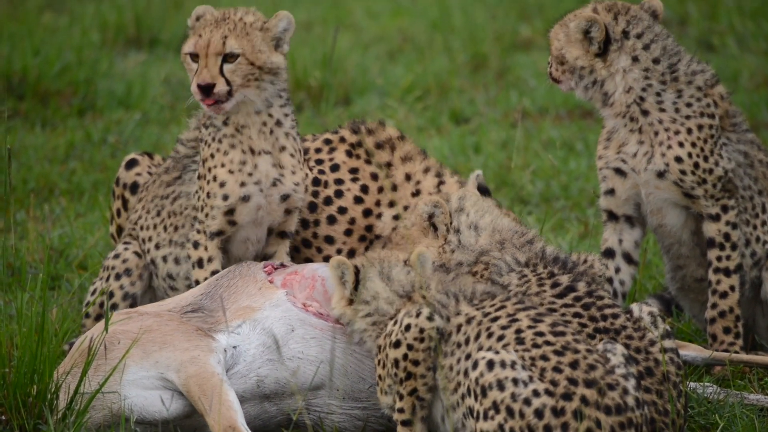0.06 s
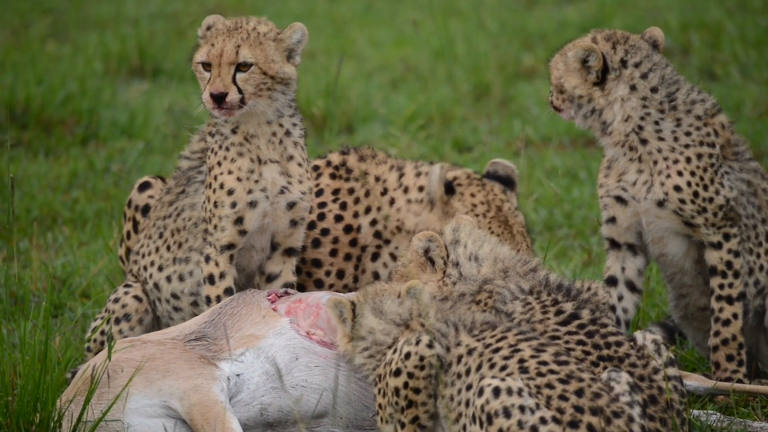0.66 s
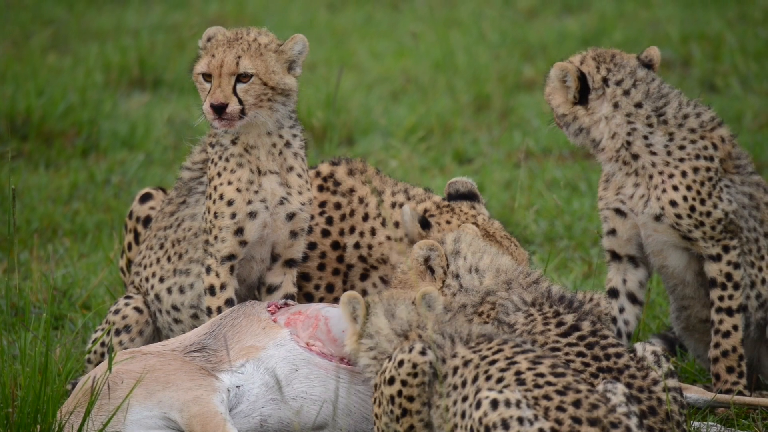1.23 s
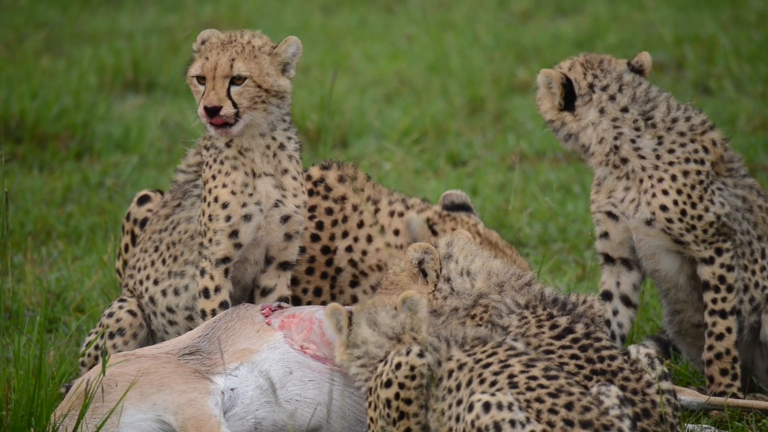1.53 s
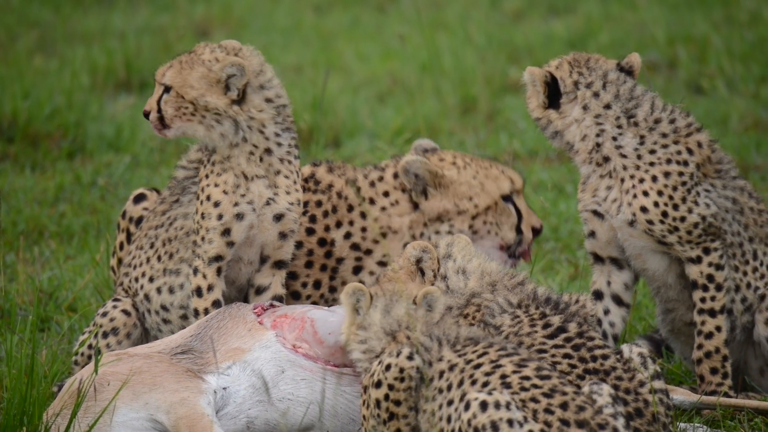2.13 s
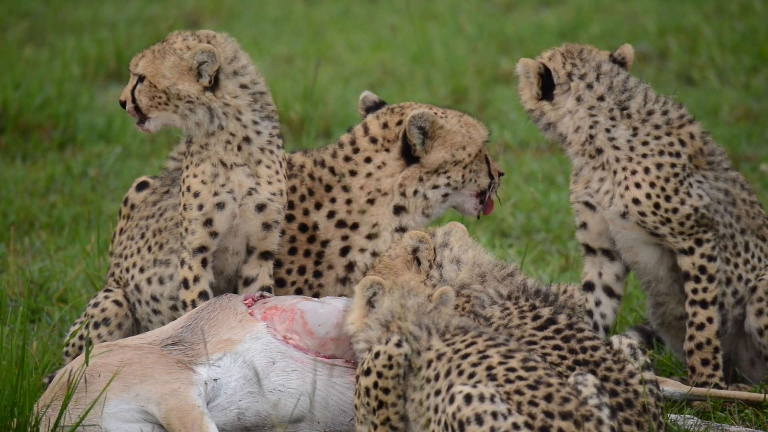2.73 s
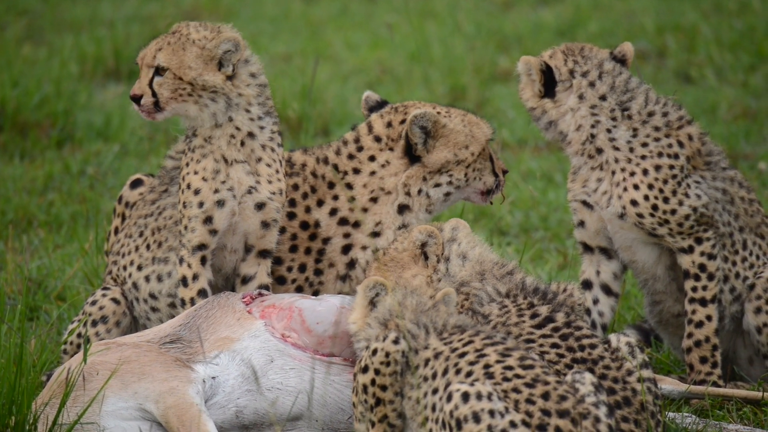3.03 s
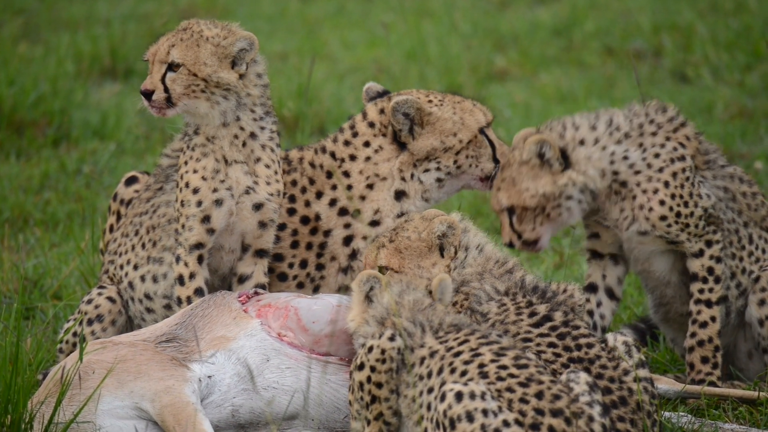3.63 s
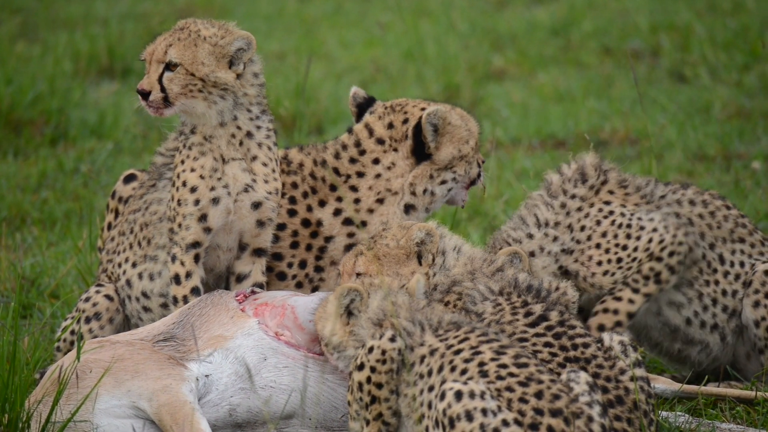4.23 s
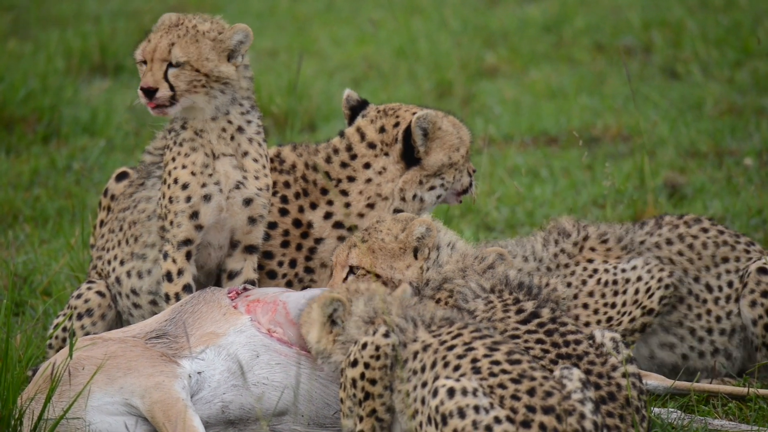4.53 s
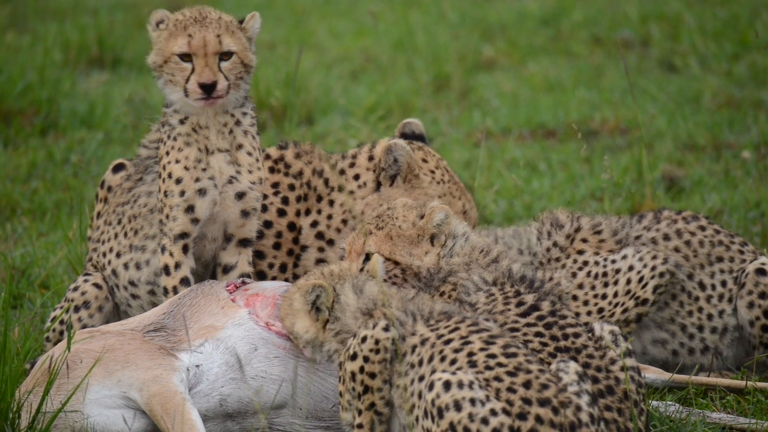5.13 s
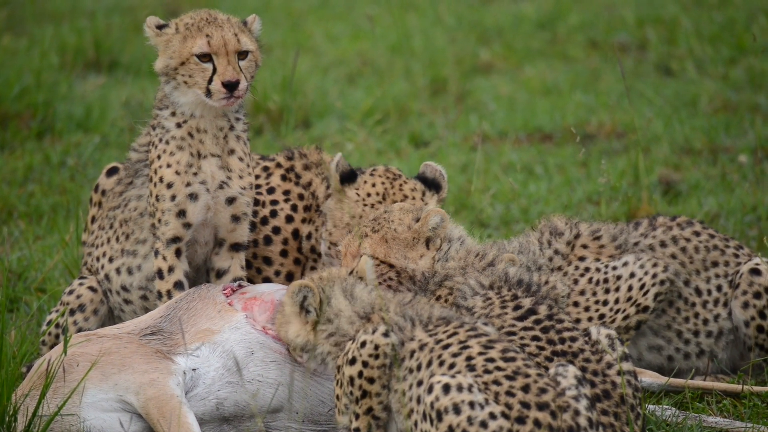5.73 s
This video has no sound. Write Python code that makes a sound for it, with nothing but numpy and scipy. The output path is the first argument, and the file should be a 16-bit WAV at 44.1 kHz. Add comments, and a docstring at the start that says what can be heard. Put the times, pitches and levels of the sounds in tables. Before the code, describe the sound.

Quick, birdlike falling chirps come at a steady pace outdoors, with a dove's rolling song and faraway birds behind them.

```python
"""Far birds chatter in downward slurs over microphone hiss, a faint hum and a murmur of distant doves.
A dove repeats a three-part song with a rolling middle; a faint low tone swells once. Loudest is a small
near bird: about every 0.8 s it whistles a chirp of falling swoops, in one of four shapes, shaped by its
throat resonance. Short rasps and hoarse scratches come between. The grass and bushes of the open
grassland scatter thin tails."""
import sys
import numpy as np
from scipy import signal
from scipy.fft import rfft, irfft, next_fast_len
from scipy.io import wavfile
from scipy.ndimage import uniform_filter1d

SR = 44100
rng = np.random.default_rng(int(sys.argv[2]) if len(sys.argv) > 2 else 0)


def wrap_up_sound(samples):
    """Save the sound to the file named by the first command line argument, as 16-bit audio."""
    columns = np.atleast_2d(samples).T
    # keep every value between -1 and 1, then stretch to whole-number steps
    tamed = np.clip(columns, -1, 1)
    steps = np.round(tamed * 32767).astype(np.int16)
    wavfile.write(sys.argv[1], SR, steps)


N = 254456

# Background spectra. Each row: frequency in Hz, relative density in dB.
AIR_SPECTRUM = [(20, -8), (60, -3), (100, 1), (150, -11), (220, -33), (330, -9), (1100, -5.5), (4500, -12),
                (6000, -24), (8000, -27.5), (11000, -24), (15500, -19)]
CHORUS_SPECTRUM = [(1100, -11.5), (1500, -4), (2200, 2), (2800, -0.5), (3400, 1.5), (4000, -21),
                   (5000, -79), (7000, -63)]
FAR_DOVE_SPECTRUM = [(300, -49), (380, -7.5), (430, 3), (500, -18.5), (570, -3), (680, -5.5), (850, 2.5),
                     (1000, -6.5), (1200, -32.5)]

# Far downward slurs. Each row: start in seconds, top pitch in Hz, level in dB, left minus right in dB.
SLURS = [(0, 2960, -53.5, 7), (.222, 3110, -53.5, 11), (0.478, 3180, -51, 3), (.744, 3330, -49, 12.5),
         (.846, 2640, -52, 17), (1.089, 3280, -51, 4), (2.272, 2700, -55.5, 13), (2.394, 3160, -59.5, 20),
         (2.456, 2950, -57.5, -23), (2.805, 3220, -48.5, 1), (3.189, 3330, -47.5, 9),
         (3.496, 3445, -46, -2), (3.948, 2900, -50, 20), (3.986, 2600, -54.5, 19), (4.195, 2490, -46.5, 5),
         (4.221, 3170, -54, 21), (4.405, 3490, -52, 19), (4.683, 3076, -58, -2), (4.839, 3320, -48, 2),
         (4.932, 3090, -54.5, 18), (5.122, 3550, -56, -26), (5.389, 3426, -41, 8.5),
         (5.638, 3040, -60.5, 24)]
# Far upward flicks. Each row: start in seconds, first pitch in Hz, level in dB.
TWITTERS = [(0.037, 1600, -55), (.46, 3460, -62), (.52, 3700, -60.5), (.66, 1616, -49.5), (1.91, 3400, -62),
            (2.32, 3250, -61.5), (2.386, 3650, -58.5), (2.642, 3690, -61.5), (3.325, 1500, -60),
            (3.577, 1680, -59)]
# Whistled glides, and the sharp falling onset of the scratchy call at 4.19 s.
# Each row: start and length in seconds, first and last pitch in Hz, level in dB, left minus right in dB.
GLIDES = [(0.354, 0.11, 2060, 2270, -56, 0), (1.041, .012, 5030, 2150, -53, 0),
          (1.552, 0.053, 1338, 1296, -57, 16), (1.557, 0.18, 1900, 1526, -61, 23),
          (2.562, 0.09, 2176, 2320, -57, -7), (2.769, .14, 2280, 2384, -55, -4),
          (3.058, .09, 2250, 2430, -51, 1), (3.241, 0.052, 2293, 2040, -55, 12),
          (3.626, 0.11, 4130, 3300, -53, -14.5), (3.767, 0.12, 1500, 1257, -60, 7),
          (4.032, 0.059, 1140, 1152, -58.5, 12), (4.189, 0.026, 3877, 3450, -40.5, 18.5),
          (5.27, 0.015, 3760, 3510, -50.5, 3)]

# The dove's three notes. Each row: time into the note in seconds, pitch in Hz, level in dB.
COO = [(0, 700, -58), (.007, 810, -46), (.02, 940, -47), (.035, 950, -46), (.06, 885, -45), (.09, 835, -44),
       (.108, 725, -47), (.12, 690, -60)]
ROLL = [(0, 700, -60), (.012, 790, -48), (.028, 905, -45), (.07, 865, -44), (.115, 800, -44),
        (.2, 790, -44.5), (.32, 780, -45), (.355, 770, -53), (.37, 760, -62)]
LAST_NOTE = [(0, 700, -58), (.016, 790, -43), (.03, 850, -43), (.047, 860, -46), (.066, 820, -42),
             (.078, 790, -57)]
# Dove songs. Each row: coo start, roll start, one roll beat and last note start in seconds, gain in dB.
DOVE_SONGS = [(.267, .544, .778, .926, -1), (1.398, 1.675, 1.897, 2.069, -1),
              (2.53, 2.814, 3.053, 3.204, -.3), (3.67, 3.947, 4.201, 4.336, .6),
              (4.801, 5.093, 5.319, 5.468, 0)]

# Chirp shapes, one swoop a row. Each row: top time in seconds, top pitch in Hz, bottom time in seconds,
# bottom pitch in Hz, bow exponent (under 1 plunges at once, over 1 holds and then drops).
SWING = [(.010, 3900, .019, 3230, 1.4), (.023, 3430, .040, 2830, .7), (.055, 3350, .063, 2700, 1.2),
         (.068, 3380, .106, 2760, .6)]
DIP = [(.008, 4050, .028, 2950, 1.1), (.032, 3200, .052, 2250, 1.15), (.062, 2930, .077, 2200, 2),
       (.102, 3450, .131, 2080, .5)]
STEP = [(.008, 3900, .052, 2300, .85), (.060, 3020, .077, 2280, 1), (.085, 3000, .109, 2570, .5)]
SLIDE = [(.008, 4300, .024, 3080, 1), (.028, 3650, .082, 2220, .75), (.092, 2780, .106, 2520, 2),
         (.112, 3560, .139, 2600, 2.2)]
# Near chirps. Each row: start in seconds, shape, length factor, pitch factor, gain in dB.
CHIRPS = [(.642, SWING, 1, 1, 0), (1.392, DIP, 1, 1, 0), (2.117, STEP, 1, 1, 0), (2.956, SLIDE, 1, 1, 0),
          (3.731, DIP, 1, 1, -.3), (4.499, STEP, 1.02, 1.005, -.5), (5.333, SWING, .98, .995, -.7)]
# The near bird's throat resonance. Each row: pitch in Hz, level in dB.
THROAT_RESONANCE = [(2150, -36.5), (2500, -32), (2750, -28.5), (3100, -25.5), (3450, -23), (3800, -26),
                    (4250, -30.5)]
# Chirp overtones. Each row: overtone frequency in Hz, level against the fundamental in dB.
CHIRP_OVERTONES = [(4400, -13), (5400, -34), (6500, -42), (7700, -62.5), (9000, -46), (10500, -42),
                   (12500, -40)]
# Chirp at the microphones. Each row: frequency in Hz, left minus right in dB.
CHIRP_BALANCE = [(2400, 5), (3000, 1), (3500, 2.5), (4000, 6), (6000, 0)]

# Rasping calls. Each row: start and length in seconds, top pitch in Hz, level in dB.
RASPS = [(0.892, 0.035, 421, -49), (0.943, 0.04, 470, -47.5), (1.004, 0.028, 496.6, -47),
         (1.067, .032, 500, -48.5)]
# Scratchy calls. Each row: start and length in seconds, level in dB.
SCRATCHES = [(3.48, 0.094, -57.5), (3.64, .36, -54), (4.194, 0.17, -45), (5.625, 0.11, -55.5)]


def amp(db):
    return 10 ** (np.asarray(db) / 20)


def unit_rms(x):
    return x / np.sqrt(np.mean(x ** 2) + 1e-20)


def lookup(points, hz):
    """Interpolates on a log-frequency axis."""
    point_hz, value = np.transpose(points)
    return np.interp(np.log(hz + 1), np.log(point_hz + 1), value)


def colour(x, gain):
    """Filters by gain(Hz)."""
    size = x.shape[-1]
    return irfft(rfft(x) * gain(np.fft.rfftfreq(size, 1 / SR)), size)


def drift(size, cutoff_hz):
    """Smooth random motion, rms about one."""
    noise = rng.standard_normal(next_fast_len(size + SR // 10))
    return unit_rms(colour(noise, lambda f: 1 / (1 + (f / cutoff_hz) ** 4)))[:size]


def pan(x, side_db):
    """Places a sound by its left minus right level."""
    return x * amp([[side_db / 2], [-side_db / 2]])


def add(mix, start_s, sound):
    part = mix[:, max(round(start_s * SR), 0):][:, :sound.shape[-1]]
    part += sound[..., :part.shape[1]]


def scatter(x, t60_s, wet_db):
    """Grass and bushes return a thin tail, different at each microphone."""
    t = np.arange(SR) / SR
    echoes = rng.standard_normal((2, SR)) * (rng.random((2, SR)) < .1)
    tail = echoes * amp(-60 * t / t60_s) * (1 - np.exp(-t / .006))
    tail /= np.linalg.norm(tail, axis=1, keepdims=True)
    return amp(wet_db) * signal.fftconvolve(x, tail, axes=1)[:, :N]


def wash(spectrum, level_db, patch_db, swell_db, coherence, patch_frames, patch_bins):
    """Noise, patchy in time and frequency under a slow swell, partly alike in both channels."""
    frames, hz = N // 256 + 5, np.fft.rfftfreq(1024, 1 / SR)
    left_re, left_im, own_re, own_im, patches = rng.standard_normal((5, frames, 513))
    patches = uniform_filter1d(patches, patch_frames, axis=0)
    patches = unit_rms(uniform_filter1d(patches, patch_bins, axis=1))
    swell = unit_rms(uniform_filter1d(rng.standard_normal(frames), size=40))[:, None]
    left = left_re + 1j * left_im
    right = coherence * left + np.sqrt(1 - coherence ** 2) * (own_re + 1j * own_im)
    spectra = np.array([left, right]) * amp(lookup(spectrum, hz) + patch_db * patches + swell_db * swell)
    _, noise = signal.istft(spectra.swapaxes(1, 2), nperseg=1024, noverlap=768)
    return amp(level_db) * unit_rms(noise[:, :N])


def background(hum_hz=99, hum_db=-80):
    """Still air and microphone hiss, a blur of far birds and doves, and a low wavering hum."""
    air = wash(AIR_SPECTRUM, level_db=-62.5, patch_db=1, swell_db=.2,
               coherence=.43, patch_frames=10, patch_bins=10)
    chorus = wash(CHORUS_SPECTRUM, level_db=-56, patch_db=5.5, swell_db=1,
                  coherence=.46, patch_frames=7, patch_bins=9)
    doves = wash(FAR_DOVE_SPECTRUM, level_db=-64.5, patch_db=1, swell_db=1,
                 coherence=.44, patch_frames=24, patch_bins=2)
    hum = unit_rms(colour(rng.standard_normal(N), lambda f: 1 / (1 + ((f - hum_hz) / 6) ** 2)))
    return pan(air, side_db=.4) + chorus + pan(doves, side_db=.5) + pan(amp(hum_db) * hum, side_db=2.5)


def dove_murmur(pitch_hz=476, wander_hz=34, level_db=-71, swell_db=2, blur_hz=16):
    """Distant doves merge into one wandering, swelling tone, blurred by the long air path."""
    carrier = np.exp(2j * np.pi * np.cumsum(pitch_hz + wander_hz * drift(N, 6.05)) / SR)
    blur_re, blur_im = colour(rng.standard_normal((2, 2, N)), lambda f: 1 / (1 + (f / blur_hz) ** 2))
    tone = unit_rms((carrier * (1 + unit_rms(blur_re) + 1j * unit_rms(blur_im))).real)
    return pan(amp(level_db + swell_db * drift(N, 2.9)) * tone, side_db=7)


def whistle(hz, db, second_db, third_db, taper):
    """A bird's nearly pure tone with two weak overtones."""
    phase = 2 * np.pi * np.cumsum(hz) / SR
    tone = np.sin(phase) + amp(second_db) * np.sin(2 * phase) + amp(third_db) * np.sin(3 * phase)
    return amp(db) * tone * signal.windows.tukey(len(hz), taper)


def glide(length_s, first_hz, last_hz, db):
    """A gliding tone that swells and fades."""
    size = round(length_s * SR)
    hz = first_hz * (last_hz / first_hz) ** np.linspace(0, 1, size) * (1 + .012 * drift(size, 350))
    return whistle(hz, db + 2.4 * drift(size, 200), second_db=-35, third_db=-48, taper=.4)


def chatter(slur_end_hz=1755, slur_octaves_per_s=17.5, twitter_s=.041, flock_count=150, high_count=26):
    """Far slurs and twitters, whistled glides and one scratch's onset, over fainter random slurs."""
    out = np.zeros((2, N))
    for start_s, top_hz, db, side_db in SLURS:
        length_s = np.log2(top_hz / slur_end_hz) / slur_octaves_per_s
        add(out, start_s, pan(glide(length_s, top_hz, slur_end_hz, db), side_db))
    for start_s, first_hz, db in TWITTERS:
        add(out, start_s, pan(glide(twitter_s, first_hz, first_hz * 1.3, db), side_db=2.5))
    for start_s, length_s, first_hz, last_hz, db, side_db in GLIDES:
        add(out, start_s, pan(glide(length_s, first_hz, last_hz, db), side_db))
    for when, span, height, ending, loud, side in rng.random((flock_count, 6)):
        first_hz = 2600 + 1700 * height
        db = -61 + 7 * loud - 9 * height
        call = glide(.023 + .035 * span, first_hz, first_hz * (.5 + .32 * ending), db)
        add(out, when * N / SR, pan(call, side_db=4 + 14 * (side - .5)))
    for when, height, loud in rng.random((high_count, 3)):
        first_hz = 4300 + 1400 * height
        db = -65 + 6 * loud - 6 * height
        add(out, when * N / SR, glide(twitter_s, first_hz, first_hz * .66, db))
    return out + scatter(out, t60_s=.06, wet_db=-11) + scatter(out, t60_s=.45, wet_db=-11)


def note_contour(shape, smooth_samples=90):
    """Time, pitch and level of a dove note, corners rounded."""
    times_s, *columns = np.transpose(shape)
    t = np.arange(0, times_s[-1], 1 / SR)
    hz, db = (uniform_filter1d(np.interp(t, times_s, column), smooth_samples) for column in columns)
    return t, hz, db


def dove(roll_from_s=.068, roll_full_s=.21, beat_hz=24.2, slowing_hz_per_s=18, gap_db=-20, trim_db=.2):
    """An arched coo, a long note that breaks into slowing beats, and a short last note."""
    out = np.zeros((2, N))
    for coo_s, roll_s, beat_s, last_s, gain_db in DOVE_SONGS:
        for start_s, shape in ((coo_s, COO), (roll_s, ROLL), (last_s, LAST_NOTE)):
            t, hz, db = note_contour(shape)
            if shape is ROLL:
                since_s = start_s + t - beat_s
                beat_rad = 2 * np.pi * since_s * (beat_hz - slowing_hz_per_s * since_s / 2)
                depth = np.clip((t - roll_from_s) / (roll_full_s - roll_from_s), 0, 1)
                # pitch falls through each beat, jumps back in the gap
                hz = hz * (1 - .1 * np.sqrt(depth) * (np.sin(beat_rad) - np.sin(2 * beat_rad) / 4))
                db = db + depth * (gap_db * np.sin(beat_rad / 2) ** 2 + 1.5)
            hz = hz * (1 + .017 * drift(len(t), 140))
            db = db + trim_db + gain_db + 1.7 * drift(len(t), 130)
            add(out, start_s, whistle(hz, db, second_db=-36, third_db=-44, taper=.05))
    tail = scatter(out, t60_s=.1, wet_db=-14) + scatter(out, t60_s=.7, wet_db=-16)
    return pan(out, side_db=-4.5) + tail


def low_tone(start_s=.3, length_s=.66, pitch_hz=200, mid_db=-76, rise_db=12):
    """A faint low tone swells once."""
    progress = np.linspace(0, 1, round(length_s * SR))
    envelope = amp(mid_db + rise_db * (progress - .5)) * signal.windows.tukey(len(progress), .2)
    out = np.zeros((2, N))
    add(out, start_s, envelope * np.sin(2 * np.pi * pitch_hz * length_s * progress))
    return out


def chirp_contour(shape, turn_db=-6, turn_s=.003, fade_db_per_s=-39, smooth_samples=90):
    """Time, pitch and level of a chirp: straight climbs, bowed falls, a near break at each bottom."""
    t = np.arange(0, shape[-1][2], 1 / SR)
    hz, dip_db = 0, 0
    from_s, from_hz = 0, .89 * shape[0][1]
    for top_s, top_hz, low_s, low_hz, bow in shape:
        fall = np.clip((t - top_s) / (low_s - top_s), 0, 1) ** bow
        swoop_hz = np.interp(t, [from_s, top_s], [from_hz, top_hz]) + (low_hz - top_hz) * fall
        hz = np.where(t >= from_s, swoop_hz, hz)
        dip_db = dip_db + turn_db * np.exp(-((t - low_s) / turn_s) ** 2)
        from_s, from_hz = low_s, low_hz
    hz = uniform_filter1d(hz, smooth_samples)
    return t, hz, lookup(THROAT_RESONANCE, hz) + dip_db + fade_db_per_s * t


def near_bird(attack_s=.013, release_s=.0072, flutter_db=1.45, fizz_db=-46, trim_db=.47,
              ground_echo_s=.0029, ground_echo_db=-12, lead_rad=.24):
    """Chirps swoop down from about 4 kHz with ragged overtones and fizz; a ground echo ripples them."""
    out = np.zeros((2, N))
    for start_s, shape, stretch, pitch, gain_db in CHIRPS:
        t, hz, db = chirp_contour(np.multiply(shape, [stretch, pitch, stretch, pitch, 1]))
        size = len(t)
        db = db + trim_db + gain_db + flutter_db * drift(size, 220)
        hz = hz * (1 + .008 * drift(size, 380))
        phase = 2 * np.pi * np.cumsum(hz) / SR
        overtones = sum(amp(lookup(CHIRP_OVERTONES, k * hz)) * np.sin(k * phase + 1.5 * drift(size, 550))
                        for k in (2, 3))
        fizz = amp(fizz_db + .75 * db + 1.5 * drift(size, 300)) * rng.standard_normal((2, size))
        gate = np.minimum(t / attack_s, 1) * np.minimum((t[-1] - t) / release_s, 1)
        chirp = (amp(db) * (np.sin(phase) + overtones) + fizz) * gate
        add(out, start_s, chirp)
        add(out, start_s + ground_echo_s, amp(ground_echo_db) * chirp)
    # louder and earlier at the left microphone
    sides = np.array([[.5], [-.5]])
    out = colour(out, lambda f: amp(lookup(CHIRP_BALANCE, f) * sides) * np.exp(1j * lead_rad * sides))
    return out + scatter(out, t60_s=.07, wet_db=-17) + scatter(out, t60_s=.53, wet_db=-15)


def rasp(length_s, top_hz, db, arch=.202, formant_hz=2000, squeak_db=-7.5):
    """A short buzz on an arched pitch, with one falling squeak."""
    arc = np.sin(np.linspace(0, np.pi, round(length_s * SR)))
    hz = top_hz * (1 + arch * (arc - 1) + .051 * drift(len(arc), 400))
    phase = 2 * np.pi * np.cumsum(hz) / SR
    buzz = sum(np.cos(k * phase) / (1 + (np.log(k * top_hz / formant_hz) / .5) ** 4) for k in range(2, 9))
    squeak = glide(length_s, first_hz=4550, last_hz=1930, db=db + squeak_db)
    return amp(db) * unit_rms(buzz) * arc + squeak


def scratch(length_s, db, first_hz=3400, width_hz=850, octave_db=-19, clean=.22):
    """A falling tone and its octave, largely broken into noise bands; starts hard, then fades."""
    size = round(length_s * SR)
    progress = np.linspace(0, 1, size)
    phase = 2 * np.pi * np.cumsum(first_hz * (1 - .3 * progress)) / SR
    octave = amp(octave_db - 3.2 * progress) * np.sin(2 * phase)
    hoarse = np.array([(clean + drift(size, width_hz)) * np.sin(phase)
                       + (clean + drift(size, 2 * width_hz)) * octave for _ in range(2)])
    gate = np.minimum(progress * 25, 1) * np.minimum((1 - progress) * 5, 1)
    return amp(db - 2.1 * progress) * unit_rms(hoarse) * gate


def harsh_calls():
    """Rasps, then scratches, slightly left, with a short tail."""
    out = np.zeros((2, N))
    for start_s, length_s, top_hz, db in RASPS:
        add(out, start_s, rasp(length_s, top_hz, db))
    for start_s, length_s, db in SCRATCHES:
        add(out, start_s, scratch(length_s, db))
    return pan(out, side_db=2.5) + scatter(out, t60_s=.3, wet_db=-10)


def scene():
    return near_bird() + dove() + chatter() + harsh_calls() + dove_murmur() + low_tone() + background()


def record(dry, bend=.18, low_cut_hz=45, high_cut_hz=15850):
    """A slightly lopsided input adds a soft bump and an octave to loud chirps; then the band limits."""
    bent = colour(dry + bend * dry ** 2, lambda f: f ** 2 / (f ** 2 + low_cut_hz ** 2))
    lowpass = signal.firwin(511, high_cut_hz, window=("kaiser", 9), fs=SR)
    return signal.oaconvolve(bent, lowpass[None], "same")


dry = scene()
out = record(dry)
wrap_up_sound(out)
```